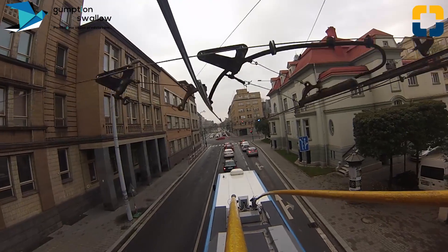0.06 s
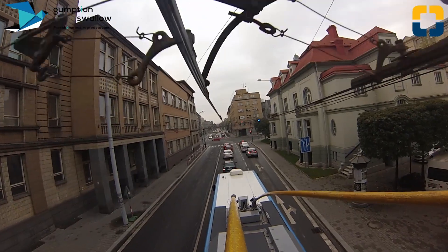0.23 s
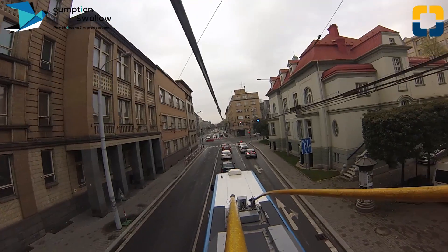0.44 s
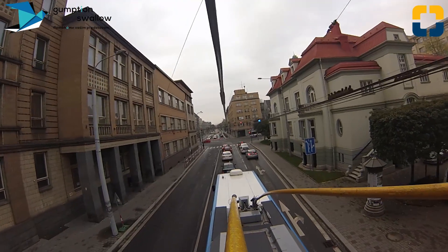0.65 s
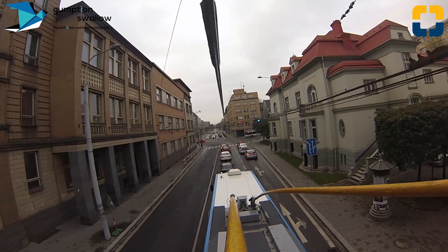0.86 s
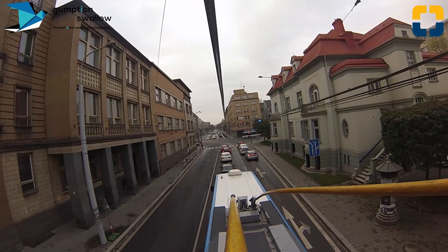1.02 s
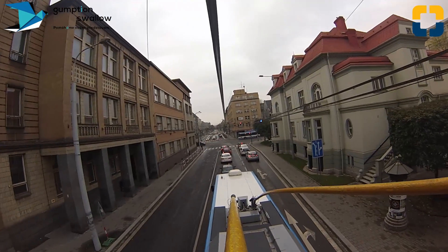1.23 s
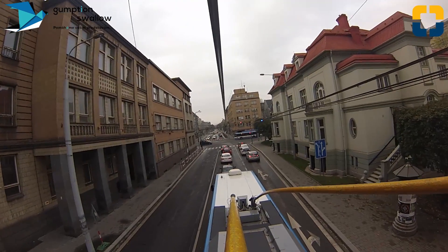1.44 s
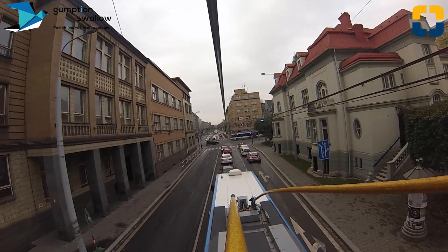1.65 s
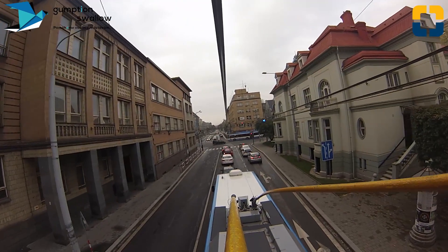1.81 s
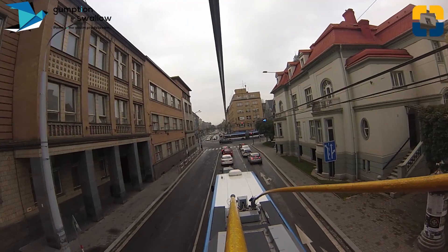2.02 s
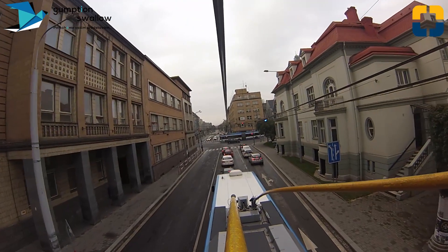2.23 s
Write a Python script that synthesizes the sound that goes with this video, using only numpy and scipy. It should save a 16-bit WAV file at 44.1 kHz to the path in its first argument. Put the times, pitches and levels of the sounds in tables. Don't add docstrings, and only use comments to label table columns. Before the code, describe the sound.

Trolleybus collector shoe on an overhead wire, heard muffled through the metal pole and a closed housing. Soft clicks and hollow thumps come at 0-0.25 s and again at 0.45-0.6 s. A sharp scraping clack hits near 0.75 s, the hardest blow at 1.06 s, followed by falling springy chirps and small ticks until about 1.2 s. A hollow ring then fades over unsteady low hum and faint sliding noise.

```python
import sys
import numpy as np
from scipy import signal
from scipy.fft import rfft, irfft
from scipy.io import wavfile
from scipy.ndimage import uniform_filter1d

SR = 44100
rng = np.random.default_rng(int(sys.argv[2]) if len(sys.argv) > 2 else 0)


def pcm_store(signal):
    levels = np.round(np.clip(np.atleast_2d(signal), -1, 1) * 32767)
    wavfile.write(sys.argv[1], SR, levels.astype(np.int16).T)


def level_to_linear(level):
    exponent = np.asarray(level, float) / 20
    return 10 ** exponent


N = 100062
T = np.arange(N) / SR
HZ = np.fft.rfftfreq(2 * N, 1 / SR)

# [f/Hz, width/Hz, level/dB]
LOW_MODES = [(178.4, 66, -5.5), (230.3, 15.6, -2), (255, 21.1, 0.5), (280, 48.1, 2.5), (300.2, 35, 0),
             (335.8, 66, -20), (446, 100, -19.5)]
MID_MODES = [(612, 160, -17), (765, 45, -5), (971, 75, -4.5), (1231, 56, -6.5), (1404, 57, -9.5)]
TOP_MODES = [(1824, 69, -5.5), (1939, 86, 0.5), (2073, 76.6, 0), (2410, 112, -5), (2815, 230, -20.5),
             (3445, 165, -11.5), (3817, 125, -10), (4555, 98, -18), (4960, 410, -31.5), (5900, 810, -41),
             (7400, 230, -34.5)]
# [f/Hz, width/Hz, level/dB]
CLICK_MODES = [(470, 140, -7.5), (765, 102, -2.5), (978, 67, 1.5), (1196, 430, -8), (1371, 82, -2)]
# [f/Hz, width/Hz, level/dB]
STEEL_MODES = [(3000, 510, 8.5), (5180, 400, 4), (7340, 490, -18)]
# [f/Hz, width/Hz, level/dB]
RETURN_LOW_MODES = [(255, 25, -9), (290, 55, -2.5)]
# [f/Hz, width/Hz, level/dB]
RETURN_MID_MODES = [(500, 200, -8), (790, 200, 0), (1000, 200, 0), (1300, 300, -3)]
# [f/Hz, width/Hz, level/dB]
RUMBLE_MODES = [(27, 17, 2.5), (81, 18, -5.5), (113, 32, -2)]
# [f/Hz, density/dB]
FLOOR_SPECTRUM = [(25, 2), (80, -2.5), (130, -13.5), (400, -39), (1600, -43), (3000, -42), (6000, -46.5),
                  (12500, -55)]
# [t/s, level/dB, f/Hz]
HUM_SWELLS = [(-.05, -36, 45.5), (0.112, -34, 43.33), (0.25, -32.5, 44.9), (0.429, -36.5, 47),
              (0.622, -32, 44.33), (0.822, -44.5, 48.73), (.96, -42, 41.86), (1.021, -31.5, 46.5),
              (1.121, -40, 46.92), (1.318, -35, 45.88), (1.48, -47, 49.35), (1.552, -36.5, 45.76),
              (1.784, -32.5, 45), (1.993, -39, 44.66), (2.1, -35, 43.9), (2.28, -41, 43.5)]
# [t/s, level/dB, f/Hz, rise/s]
THUMPS = [(-.03, -24.5, 280.8, 0.021), (.035, -31, 280, 0.0092), (0.092, -30.5, 263, 0.0037),
          (0.204, -32.5, 254.6, 0.02), (0.546, -31.5, 213.6, 0.0081), (0.579, -22.5, 242, 0.005),
          (0.609, -30, 220, 0.0073), (0.704, -31, 259, 0.011), (0.756, -20.5, 255, 0.0061),
          (0.833, -48, 192, 0.01), (1.060, -19, 278, 0.0012), (1.0649, -18, 263, 0.0084)]
# [t/s, level/dB, f/Hz, rise/s, t60/s]
CLANGS = [(.012, -50.5, 2200, 0.0036, 0.057), (.030, -45, 1390, 0.0038, .1),
          (.238, -49.5, 2374, 0.0094, 0.047), (.261, -46, 2060, 0.0039, 0.029),
          (.570, -29.5, 295.4, 0.0033, 0.051), (.572, -40.5, 555, 0.0078, 0.043),
          (.7455, -15.5, 1010, 0.0048, 0.017), (.760, -30.5, 349, 0.0082, 0.014),
          (0.7535, -16.5, 957, 0.0023, 0.014), (.758, -27.5, 765, 0.0084, 0.058),
          (.763, -43, 912, 0.0044, 0.024), (.957, -47.5, 1992, 0.0037, 0.091),
          (1.0585, -43.5, 3726, 0.0026, 0.018), (1.128, -46, 2090, 0.0056, 0.029),
          (1.142, -37, 2020, .004, 0.047), (1.164, -42.5, 2540, .001, 0.025)]
# [t/s, level/dB, f/Hz, rise/s, t60/s]
ECHOES = [(.15, -37.5, 290, 0.014, 0.096), (.207, -31.5, 280, 0.0024, 0.18),
          (.44, -45.5, 266.7, 0.0096, 0.14), (0.599, -36.5, 175.8, 0.022, 0.79),
          (.70, -36, 183, 0.048, 0.13), (0.851, -34, 269.2, 0.016, 0.26), (1.152, -20, 280, 0.02, 0.054),
          (1.182, -22, 255, 0.0068, 0.12), (1.226, -32.5, 280, 0.014, 0.32), (1.264, -30, 256, 0.031, 0.11),
          (1.31, -34.5, 290, 0.011, 0.27), (1.346, -31.5, 282.2, 0.019, 0.18),
          (1.398, -32.5, 283, 0.005, 0.093), (1.476, -36, 260.6, 0.014, 0.29),
          (1.561, -42, 286, .02, 0.094), (1.628, -43, 268.4, 0.01, 0.28), (1.341, -41, 184, 0.013, 0.52),
          (1.531, -43.5, 196.5, 0.018, 0.63), (1.801, -47.5, 193.7, 0.031, 0.9)]
# [t/s, level/dB, brightness/dB, rattle length/s]
CLICKS = [(0.0058, -21, -24, 0.014), (0.073, -33, -20, 0.014), (0.161, -46, -5, 0.006),
          (0.2025, -30, -30, 0.018), (0.23, -42, -4, 0.012), (0.464, -46, -4, 0.006),
          (0.484, -25.5, -30, 0.014), (0.529, -38, -14, 0.02), (0.570, -34.5, -13, 0.018),
          (0.587, -42, -4, 0.005), (0.612, -36, -6, 0.006), (0.618, -35, -10, 0.015),
          (0.7064, -20, -12, 0.012), (1.0592, -25, -6, 0.016), (1.1288, -25, -18, 0.005),
          (1.1645, -40, -1, 0.003)]
# [t/s, level/dB]
TICKS = [
    (.7066, -46),
    (1.0595, -44),
    (1.073, -56),
    (1.106, -57),
    (1.169, -50),
]
# [delay/round trips, low level/dB, mid level/dB, top level/dB]
RETURNS = [(1.0, -7, -7, 0), (1.4, -14, -12, -8), (1.9, -20, -4, -11), (3.0, -22, -3, -17),
           (3.9, -24, -5, -21), (4.9, -26, -5, -24), (5.8, -28, -8, -27), (6.8, -30, -9, -30),
           (7.8, -32, -11, -33), (8.8, -32, -13, -36)]

SKIRT_LOW, SKIRT_HIGH = 0.35, 1.47
GUST_DB = 1.5
SLIDE_LOW_DB, SLIDE_MID_DB, SLIDE_TOP_DB, SLIDE_AIR_DB = -55.5, -67, -66, -73
SLIDE_FLUTTER_DB = 1.5
RING_LOW_DB, RING_MID_DB, RING_TOP_DB, RING_AIR_DB = -20.5, -28.5, -34.5, -55
RING_LOW_T60_S, RING_MID_T60_S, RING_TOP_T60_S, RING_RISE_S = 2.5, 2.5, 1.01, 0.0063
FLOOR_DB = -53.5
RUMBLE_DB, RUMBLE_FADE_DB_PER_S = -51.5, -8.5
HUM_FLATNESS, HUM_FUZZ_DB = 0.97, -52.5
THUMP_T60_S, PARTNER_RATIO, PARTNER_DB = 0.069, 0.665, -7
RATTLE_DB, RATTLE_GRIT_DB, RATTLE_SAG_DB, RATTLE_RELEASE_S = -22, 3.5, -0.5, .0015
SCRAPE_S, SCRAPE_LENGTH_S, SCRAPE_TILT_DB_PER_OCT = .7455, .022, 3
SCRAPE_DB, SCRAPE_BODY_DB, SCRAPE_STEEL_DB = -52.5, -38, -54.5
STEEL_EDGE_HZ = 7900
BLOW_S, TRIP_S = 1.057, .055
TENSION_HZ = 40
WIRE_LOSS_HZ = 4600
SCATTER = .015
RETURN_LOW_DB, RETURN_MID_DB, RETURN_TOP_DB = -19, -22, -35
EDGE_HZ = 12300


def evened(x):
    return x / np.sqrt(np.mean(x ** 2) + 1e-20)


def modes(table, tilt_db_per_oct=0):
    f_first, f_last = table[0][0], table[-1][0]
    low = 1j * HZ / (SKIRT_LOW * f_first)
    high = 1j * HZ / (SKIRT_HIGH * f_last)
    skirts = low / (1 + low) / (1 + high + high ** 2) ** 2
    total = 0
    for k, (f, width, db) in enumerate(table):
        gain = (-1) ** k * level_to_linear(db + tilt_db_per_oct * np.log2(f / f_first))
        total = total + gain * 1j * HZ * width / (f ** 2 - HZ ** 2 + 1j * HZ * width)
    return skirts * total


def through(x, response):
    return irfft(rfft(x, 2 * N) * response)[:N] / abs(irfft(response)).max()


def drift(rate_hz):
    rates_hz = np.geomspace(rate_hz / 20, rate_hz, 24)
    return evened(sum(np.sin(2 * np.pi * (f * T + rng.random())) / np.sqrt(f) for f in rates_hz))


def impulse(t_s):
    return np.arange(N) == round(t_s * SR)


def window(start_s, length_s):
    t = np.maximum(T - start_s, 0)
    sag = level_to_linear(RATTLE_SAG_DB * np.minimum(t / length_s, 1))
    release = np.exp(-np.maximum(t - length_s, 0) / RATTLE_RELEASE_S)
    return (T >= start_s) * sag * release


def struck(start_s, db, hz, rise_s, t60_s):
    t = np.maximum(T - start_s, 0)
    rise = np.sin(np.pi / 2 * np.minimum(t / rise_s, 1))
    decay = level_to_linear(db - 60 * np.maximum(t - rise_s, 0) / t60_s)
    return rise * decay * np.sin(2 * np.pi * hz * t)


def hum():
    s, db, hz = np.transpose(HUM_SWELLS)
    place = np.interp(T, s, np.arange(len(s)))
    k = place.astype(int)
    beat = np.sin(np.pi * place)
    swell = level_to_linear(db[k]) * np.sign(beat) * abs(beat) ** HUM_FLATNESS
    glide_hz = uniform_filter1d(hz[k], size=2000)
    note = np.sqrt(2) * np.sin(2 * np.pi * np.cumsum(glide_hz) / SR)
    fuzz = evened(through(rng.standard_normal(N), modes([(47, 22, 0)]) ** 2))
    return swell * note + level_to_linear(HUM_FUZZ_DB) * fuzz


def wire():
    registers = [(LOW_MODES, SLIDE_LOW_DB, RING_LOW_DB, RING_LOW_T60_S),
                 (MID_MODES, SLIDE_MID_DB, RING_MID_DB, RING_MID_T60_S),
                 (TOP_MODES[:4], SLIDE_TOP_DB, RING_TOP_DB, RING_TOP_T60_S),
                 (TOP_MODES[4:], SLIDE_AIR_DB, RING_AIR_DB, RING_TOP_T60_S)]
    out = np.zeros(N)
    shared = drift(60.)
    for table, slide_db, ring_db, t60_s in registers:
        flutter = level_to_linear(SLIDE_FLUTTER_DB * shared + GUST_DB * drift(15.))
        power = level_to_linear(2 * slide_db)
        for s, db, _, _ in THUMPS:
            t = np.maximum(T - s, 0)
            rise = np.minimum(t / RING_RISE_S, 1)
            power = power + rise * level_to_linear(2 * (db + ring_db - 60 * t / t60_s))
        out += np.sqrt(power) * evened(through(flutter * rng.standard_normal(N), modes(table)))
    return out


def floor():
    f, db = np.transpose(FLOOR_SPECTRUM)
    response = level_to_linear(np.interp(np.log(HZ + 1), np.log(f), db))
    noise = evened(through(rng.standard_normal(N), response))
    return level_to_linear(FLOOR_DB + GUST_DB * drift(8.)) * noise


def rumble():
    shudder = evened(through(rng.standard_normal(N), modes(RUMBLE_MODES)))
    return level_to_linear(RUMBLE_DB + RUMBLE_FADE_DB_PER_S * T) * shudder


def thumps():
    out = np.zeros(N)
    for s, db, hz, rise_s in THUMPS:
        out += struck(s, db, hz, rise_s, THUMP_T60_S)
        out += struck(s, db + PARTNER_DB, hz * PARTNER_RATIO, rise_s, THUMP_T60_S)
    return out + sum(struck(*row) for row in CLANGS + ECHOES)


def clicks():
    grit_db = RATTLE_GRIT_DB * np.minimum(rng.exponential(1, N), 4) - 14.5
    grit = rng.standard_normal(N) * level_to_linear(grit_db)
    rub = window(SCRAPE_S, SCRAPE_LENGTH_S) * grit
    mid = level_to_linear(SCRAPE_BODY_DB) * rub
    top = np.zeros(N)
    for s, db, bright_db, length_s in CLICKS:
        force = level_to_linear(RATTLE_DB) * window(s, length_s) * grit + impulse(s)
        mid = mid + level_to_linear(db) * force
        top = top + level_to_linear(db + bright_db) * force
    bare = level_to_linear(SCRAPE_STEEL_DB) * rub + sum(level_to_linear(db) * impulse(s) for s, db in TICKS)
    edge = 1 / (1 + (HZ / STEEL_EDGE_HZ) ** 24)
    housing = through(mid, modes(CLICK_MODES)) + through(top, modes(TOP_MODES, -15.0))
    scrape = level_to_linear(SCRAPE_DB) * through(rub, edge * modes(TOP_MODES, SCRAPE_TILT_DB_PER_OCT))
    return housing + scrape + through(bare, edge * modes(STEEL_MODES))


def returns():
    blow = np.exp(-2j * np.pi * HZ * BLOW_S) / (1 + (HZ / WIRE_LOSS_HZ) ** 8)
    lag = 4 * np.pi * np.sqrt(1e3) * TRIP_S
    spread = np.sqrt(HZ + TENSION_HZ) - np.sqrt(TENSION_HZ)
    chirps = []
    for row, jitter in zip(RETURNS, rng.uniform(-0.41, 1, (len(RETURNS), 3))):
        scatter = SCATTER * max(row[0] - 1.5, 0) / 2
        chirps.append(sum(np.exp(-1j * lag * (row[0] + scatter * j) * spread) for j in jitter))
    registers = [(1, modes(RETURN_LOW_MODES), RETURN_LOW_DB),
                 (2, modes(RETURN_MID_MODES), RETURN_MID_DB),
                 (3, modes(TOP_MODES, 1), RETURN_TOP_DB)]
    out = np.zeros(N)
    for column, response, db in registers:
        train = sum(level_to_linear(row[column]) * chirp for row, chirp in zip(RETURNS, chirps))
        out += level_to_linear(db) * through(irfft(blow * train), response) / 3
    return out


def scene():
    return (hum() + wire() + floor() + rumble() + thumps() + clicks() + returns())[None]


def top_cut(x):
    return signal.sosfilt(signal.butter(12, 12770, fs=SR, output="sos"), x)


def record(dry):
    lowpass = signal.firwin(511, EDGE_HZ, window=("kaiser", 9), fs=SR)
    mix = signal.oaconvolve(dry, lowpass[None], "same")
    return top_cut(mix)


dry = scene()
out = record(dry)
pcm_store(out)
```